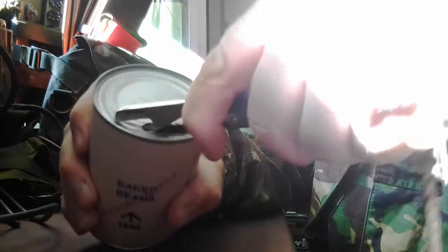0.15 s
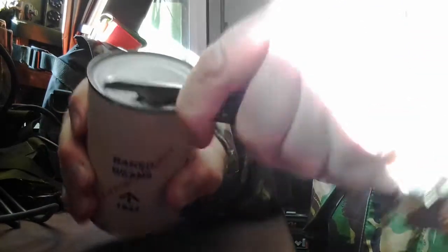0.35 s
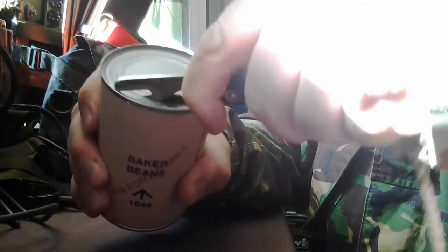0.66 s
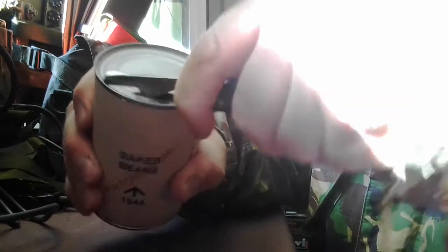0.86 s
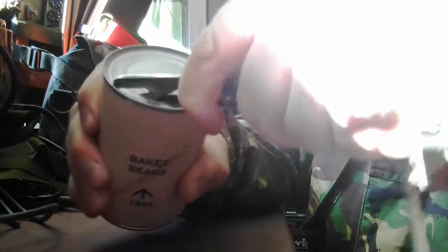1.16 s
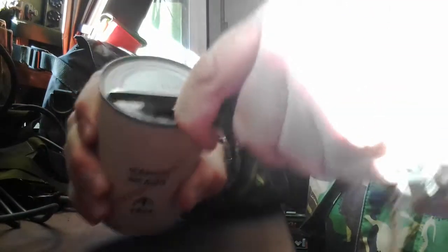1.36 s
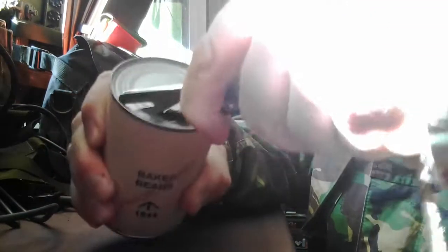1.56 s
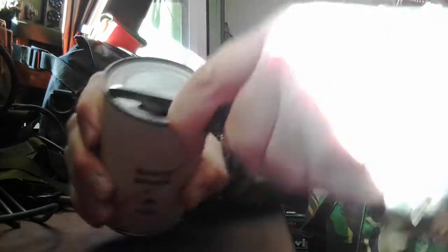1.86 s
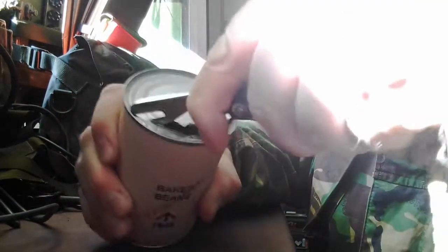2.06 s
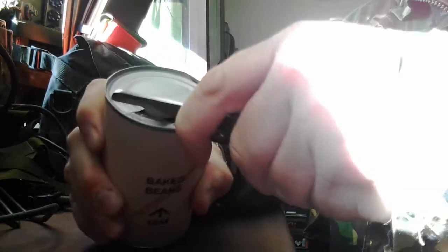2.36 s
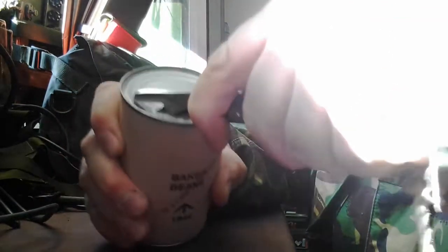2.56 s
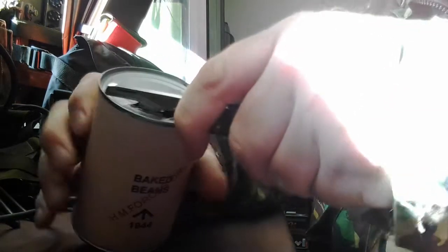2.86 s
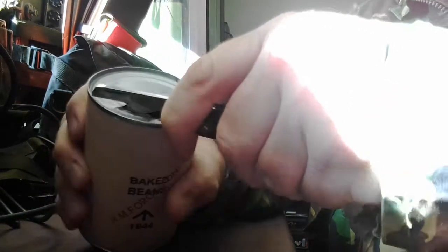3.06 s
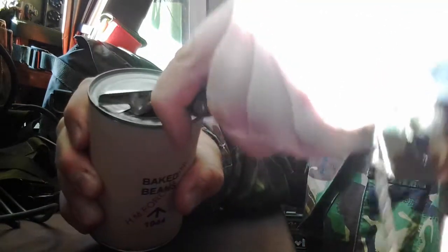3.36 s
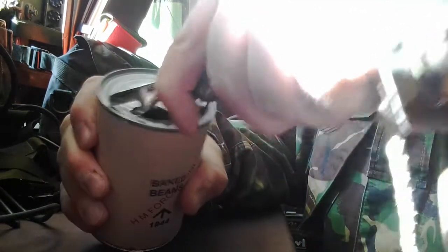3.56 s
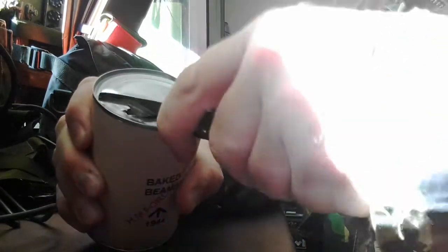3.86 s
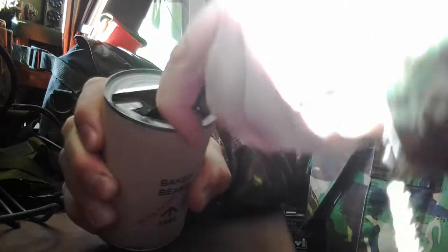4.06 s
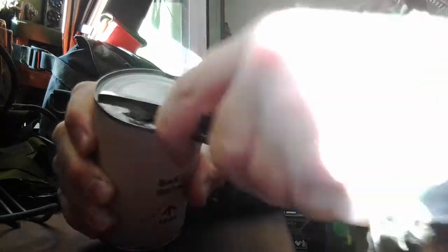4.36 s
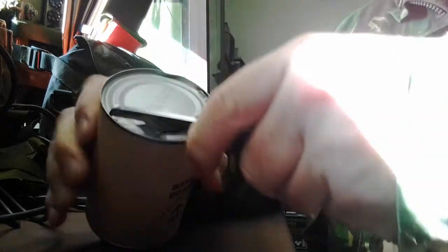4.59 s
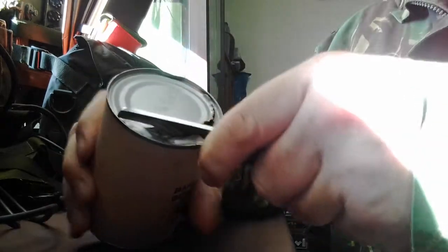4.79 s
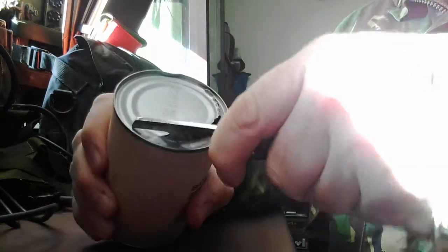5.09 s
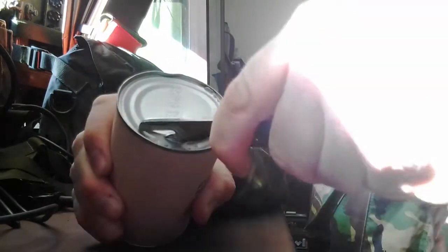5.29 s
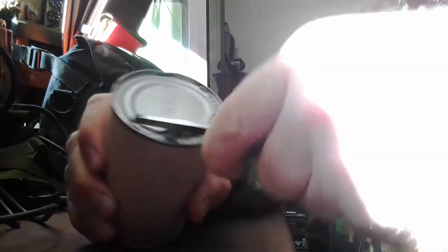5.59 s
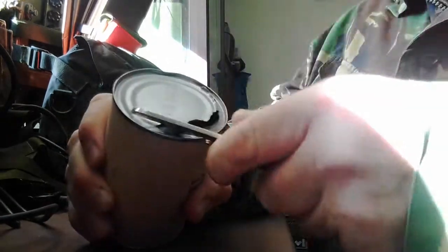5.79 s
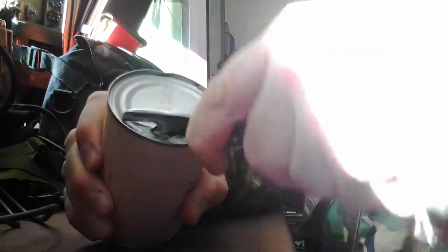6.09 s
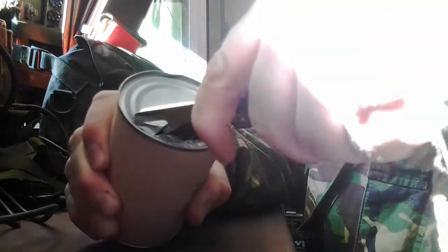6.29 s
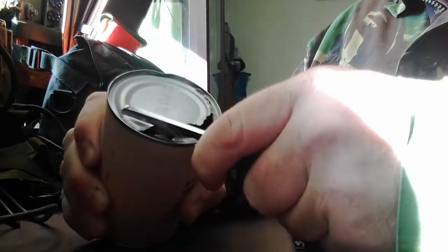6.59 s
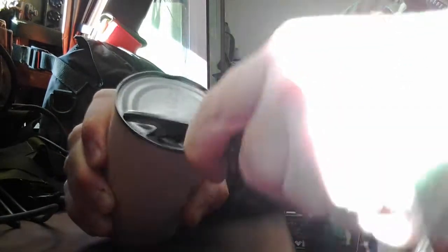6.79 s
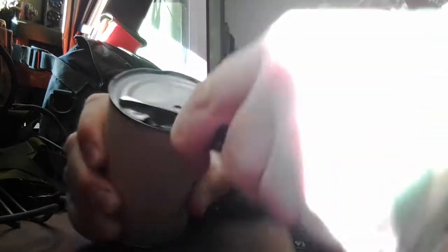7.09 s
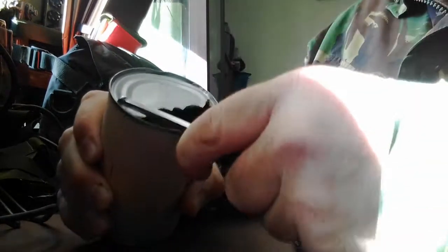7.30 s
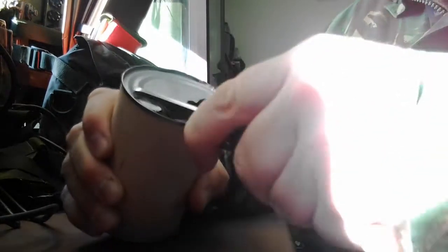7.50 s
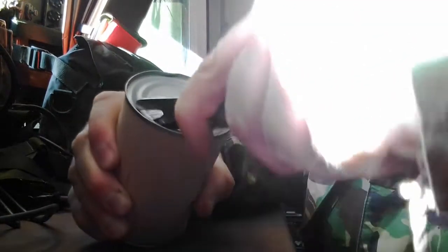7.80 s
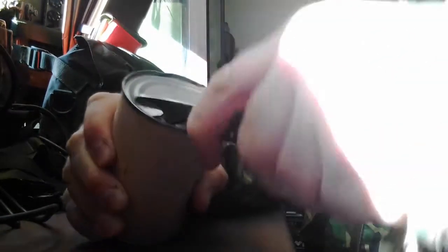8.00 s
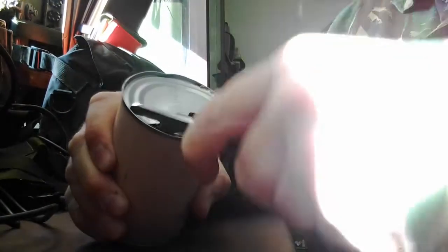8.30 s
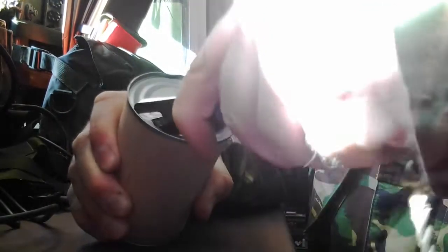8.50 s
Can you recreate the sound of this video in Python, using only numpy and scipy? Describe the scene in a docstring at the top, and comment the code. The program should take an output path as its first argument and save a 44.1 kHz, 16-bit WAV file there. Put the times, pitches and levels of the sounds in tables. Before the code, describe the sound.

Close up, an empty tin's lid honks and rings as a blade tears it in uneven snaps, with rubbing and dull hand thumps.

```python
"""A small lever opener is rocked around the rim of an empty steel tin, close to a webcam in a small room.
Soft noise and a thin whistle last throughout. From the start, a resonant lid honks as the blade tears it in jerks.
A faint early copy of the clink comes before every blow; then noise and dying tones make the steel crack and ring.
Between cuts, random small slips make the opener scrape and clink, and filtered noise rubs.
Now and then the hand thumps softly, as a low dying tone, when it takes a new grip."""
import sys
import numpy as np
from scipy import signal
from scipy.fft import rfft, irfft, next_fast_len
from scipy.io import wavfile
from scipy.ndimage import uniform_filter1d, map_coordinates

SR = 44100
rng = np.random.default_rng(int(sys.argv[2]) if len(sys.argv) > 2 else 0)


def unload_audio(sound):
    """Save the sound as a 16-bit wav file, at the path given as the first command line argument."""
    columns = np.transpose(np.atleast_2d(sound))
    # keep every value between -1 and 1, then stretch to whole-number steps
    steps = np.round(np.clip(columns, -1, 1) * 32767)
    wavfile.write(sys.argv[1], SR, steps.astype(np.int16))


N = 381465
HEAD = round(.01 * SR)  # the first 10 ms of a sound, in samples
TAIL = round(.04 * SR)  # 40 ms, in samples
T = np.arange(round(.3 * SR)) / SR  # the time within one short sound, in seconds

# the lid's swaying shapes: times_note (multiple of its note), level_db (against each other)
LID_SHAPES = [(.7, -6), (0.831, -12), (1, 11), (1.116, 0)]


def amp(db):
    """Turn decibels into a gain."""
    return 10 ** (np.asarray(db) / 20)


def rms(x):
    """Root mean square: the average strength of a sound."""
    return np.sqrt(np.mean(x ** 2) + 1e-20)


def along(points, hz):
    """Read values between (Hz, value) points, with frequency on a log axis."""
    point_hz, value = np.transpose(points)
    return np.interp(np.log(hz + 1), np.log(point_hz + 1), value)


def curves(rows):
    """Draw straight lines through each column after the time: one value per sample."""
    s, *columns = np.transpose(rows)
    return [np.interp(np.arange(N) / SR, s, column) for column in columns]


def filtered(x, response):
    """Shape x by a response that depends on frequency."""
    size = next_fast_len(N + SR // 2)
    spectrum = rfft(x, size) * response(np.fft.rfftfreq(size, 1 / SR))
    return irfft(spectrum, size)[:N]


def band(x, lo_hz, hi_hz, order):
    """Keep the band between two frequencies, without sounding ahead of time."""
    edges_hz = [lo_hz, min(hi_hz, SR / 2 - 1)]
    return signal.sosfilt(signal.butter(order, edges_hz, "band", fs=SR, output="sos"), x)


def add(track, s, sound):
    """Mix a sound into a track at a time in seconds."""
    part = track[max(round(s * SR), 0):][:len(sound)]
    part += sound[:len(part)]


def ring(hz, t60):
    """One dying tone from a random phase; it falls by 60 dB in t60 seconds."""
    return amp(-60 * T / t60) * np.sin(2 * np.pi * (hz * T + rng.random()))


def steady(x, seconds):
    """Even out the slow level of x to about rms 1."""
    power = uniform_filter1d(x ** 2, max(int(seconds * SR), 1))
    power = uniform_filter1d(power, HEAD // 2)
    return x / np.sqrt(np.abs(power) + 1e-4 * np.mean(x ** 2))


def slips(per_second, spread_db):
    """Stick-slip: tiny jerks at uneven times, of uneven sizes and either direction."""
    happens = rng.random(N) < per_second / SR
    return happens * amp(spread_db * rng.standard_normal(N)) * rng.choice([-1, 1], N)


def wobble(rate):
    """A smooth random curve with this many knots a second."""
    knots = rng.standard_normal(int(N * rate / SR) + 4)
    return map_coordinates(knots, [np.arange(N) * rate / SR])


def resonance(f, hz, width_hz):
    """How strongly one resonance answers each frequency f."""
    return 1j * f * width_hz / (hz * hz - f * f + 1j * f * width_hz)


def moving_mode(force, note, t60):
    """A resonance that rings after every jerk while its pitch moves."""
    turn = np.exp(2j * np.pi * np.cumsum(note) / SR)
    keep = amp(-60 / (t60 * SR))  # the share left after each sample
    return (turn * signal.lfilter([1], [1, -keep], force / turn)).real


def fine_body(t60=0.013, direct_db=12):
    """Thin steel has countless close modes: a short, ragged answer of energy 1."""
    answer = rng.standard_normal(len(T)) * amp(-60 * T / t60)
    answer[0] = amp(direct_db)
    return answer / np.linalg.norm(answer)


def blow(head, tail, ring_db):
    """A short burst with a longer ring; together they have rms 1 over the first 10 ms."""
    both = head / rms(head[:HEAD]) + amp(ring_db) * tail / rms(tail[HEAD:TAIL])
    return both / rms(both[:HEAD])


def floor():
    """Soft background noise and a thin electronic whistle, made of narrow noise."""
    # the quiet room and the microphone's own noise: pitch_hz, level_db (shape only)
    noise_shape = [(20, -13.5), (60, 0.5), (140, 2), (300, -1.5), (700, 4), (1500, -9), (3000, -25),
                   (7000, -30), (9000, -45), (15500, -42.5)]
    noise = filtered(rng.standard_normal(N), lambda f: amp(along(noise_shape, f)))
    whistle = band(rng.standard_normal(N), 11970, 12150, order=2)
    return amp(-61.5) * noise / rms(noise) + amp(-96) * whistle / rms(whistle)


def room(x):
    """The small room's answer, 10 ms late; each frequency dies at its own speed."""
    # how long the room rings: pitch_hz, t60_s (time to fall by 60 dB)
    decay = [(150, 0.29), (700, 0.13), (3000, 0.095), (8000, 0.19), (15000, 0.23)]
    hz, t, z = signal.stft(rng.standard_normal(SR // 2), SR, nperseg=256)
    dying = z * amp(-60 * t / along(decay, hz)[:, None])
    tail = signal.istft(dying, SR, nperseg=256)[1]
    return signal.fftconvolve(x, np.pad(tail / np.linalg.norm(tail), (HEAD, 0)))[:N]


def handling(tin):
    """Every jolt also shakes the whole tin in the hand, as a low mutter."""
    # how firmly the hand passes the jolts on: time_s, gain_db
    grip = [(0, -31.5), (1.4, -23), (2, -29), (3.2, -9), (4.1, -14.5), (5, -1.5), (6.5, -19), (8.65, -24.5)]
    jolts = band(tin, 1700, 8000, order=1)
    force = np.sqrt(np.abs(uniform_filter1d(jolts ** 2, HEAD)))
    mutter = band(rng.standard_normal(N), 140, 300, order=2)
    return amp(curves(grip)[0]) * force * mutter / rms(mutter)


def thumps(hz=125, t60=0.064):
    """A new grip gives a dull push: a few low swings and a little rumble."""
    # the hand takes a new grip: start_s, level_db (before the 3 dB lift and soft start below)
    grips = [(0.27, -38.5), (2.096, -27), (2.295, -38.5), (2.484, -28), (2.72, -31.5), (2.914, -26.5),
             (4.456, -32), (6.025, -24), (6.786, -33), (7.248, -36.5), (7.732, -26.5), (8.154, -32),
             (8.457, -44)]
    out = np.zeros(N)
    for s, db in grips:
        rumble = band(rng.standard_normal(len(T)), 110, 190, order=2) * amp(-60 * T / 0.1)
        swings = ring(hz * (1 + 0.047 * rng.standard_normal()), t60)
        push = swings + amp(-18.5) * rumble / rms(rumble[:TAIL])
        soft_start = (1 - np.exp(-T / 0.003)) ** 2
        add(out, s, amp(db + 3.0) * push * soft_start)
    return out


def rubbing():
    """Skin and sleeve slide over the tin, with stray ticks of the loose opener."""
    # the tone of skin and sleeve: pitch_hz, level_db (shape only)
    rub_shape = [(40, -10), (130, 10), (420, 14), (900, -12.5), (1400, 4), (1900, 6), (3000, 2), (4200, 0),
                 (5300, -5.5), (6600, 3), (7500, -9.5), (8500, -12.5), (10500, -29), (15000, -44)]
    fibres = slips(per_second=660, spread_db=1.5) + amp(-19.0) * rng.standard_normal(N)
    pressure = amp(3.5 * wobble(45))
    ticks = slips(per_second=32, spread_db=4.5)
    ticks = signal.fftconvolve(ticks, fine_body(t60=.025, direct_db=10.5))[:N]
    rub = filtered(pressure * fibres + amp(5.5) * ticks, lambda f: amp(along(rub_shape, f)))
    return steady(rub, seconds=0.067)


def drag_levels():
    """Lid, wall and hiss in dB: drags and rubs rise, hold and fall above the hand's light sliding."""
    # how hard the hand slides the tin and the resting opener: time_s, level_db (before the offsets)
    slide = [(0.0, -69.5), (0.48, -71.5), (1.73, -82.5), (1.88, -70), (2.43, -56.5), (2.58, -66.5),
             (3.03, -56.5), (3.49, -66), (4.34, -69.5), (4.55, -57), (5.66, -72.5), (5.88, -74),
             (6.12, -57.5), (6.48, -66), (7.28, -60.5), (8.04, -67), (8.31, -62.5), (8.65, -60)]
    # one drag of the blade, or one rub of the hand over the tin:
    # start_s, length_s, lid_db, wall_db, hiss_db
    drags = [(0.09, 0.06, -56, -62, -82), (0.181, 0.0075, -41, -39, -51.5), (0.244, 0.024, -46, -50, -66),
             (0.353, 0.021, -29, -35.5, -50.5), (0.386, 0.038, -31, -45.5, -48),
             (0.412, 0.036, -28.5, -54.5, -64), (0.596, 0.055, -52, -51.5, -60),
             (0.679, 0.099, -48, -50.5, -67), (0.883, 0.032, -30, -40.5, -53),
             (1.048, 0.13, -45.5, -61.5, -73.5), (1.26, 0.03, -36, -42.5, -65.5),
             (1.424, 0.15, -45, -58.5, -77.5), (1.687, 0.035, -23.5, -37.5, -54),
             (1.897, 0.13, -44.5, -52.5, -58), (2.029, 0.052, -28.5, -39.5, -54),
             (2.192, 0.031, -30, -36.5, -49.5), (2.221, 0.016, -21, -31, -47),
             (2.275, 0.082, -50, -54.5, -54.5), (2.404, 0.023, -32.5, -35, -59),
             (2.497, 0.061, -40.5, -51.5, -50.5), (2.695, .04, -51, -60, -77),
             (2.794, 0.15, -54.5, -64, -58), (2.901, 0.05, -41, -49, -58.5), (3.129, .06, -41.5, -48, -64),
             (3.198, 0.25, -48.5, -60.5, -67), (3.517, 0.034, -53, -65, -77),
             (3.605, 0.036, -32.5, -41.5, -52), (3.787, 0.049, -29.5, -36.5, -50.5),
             (4.017, 0.051, -34.5, -50.5, -58), (4.091, 0.076, -39, -47.5, -63.5),
             (4.307, 0.09, -31.5, -39.5, -53.5), (4.704, 0.1, -77, -79, -61.5),
             (4.858, 0.14, -77, -65, -66.5), (5.012, 0.25, -51.5, -59, -73), (5.639, 0.14, -39.5, -44, -59),
             (5.888, 0.079, -47.5, -47.5, -66), (6.011, 0.064, -45, -50, -58.5),
             (6.13, 0.12, -51.5, -58, -74), (6.458, .11, -54, -52, -61), (6.728, 0.027, -32, -39, -49),
             (6.895, 0.069, -50, -56.5, -56), (7.384, 0.05, -63, -52, -65),
             (7.488, 0.019, -41.5, -42, -48.5), (8.47, 0.053, -55, -53, -52)]
    idle_offsets_db = np.array([[-4], [-4.5], [-2.5]])  # what sliding wakes in lid, wall and hiss
    attack_db_per_s, release_db_per_s = 1703, 520  # each sets in quickly and fades more slowly
    t = np.arange(N) / SR
    power = amp(curves(slide)[0] + idle_offsets_db) ** 2
    for s, length, *levels_db in drags:
        near = slice(*np.searchsorted(t, [s - T[-1], s + length + T[-1]]))
        rise_db = np.minimum(attack_db_per_s * (t[near] - s), 0)
        fall_db = np.maximum(release_db_per_s * (t[near] - s - length), 0)
        power[:, near] += np.outer(amp(levels_db), amp(rise_db - fall_db)) ** 2
    return 10 * np.log10(power)


def scraping(lid_t60=0.071, waver=0.082, clump_db=9.0):
    """The same small slips drive the lid, the wall and a gritty rasp; between cuts the hand rubs."""
    # the lid's note under the dragging blade: time_s, pitch_hz (before its wavering)
    lid_note = [(0, 647), (.4, 613), (.9, 616), (1.5, 616), (1.72, 628), (2.1, 604), (2.25, 655),
                (2.6, 713), (3.6, 716), (4.4, 784), (5.9, 735), (7.5, 693), (8.6, 730)]
    # the wall's resonances that scraping wakes: pitch_hz, width_hz, level_db (against each other)
    wall_modes = [(1003, 22, 8), (1100, 121, 9), (1255, 73, 2), (1644, 69, 1), (1946, 40, -4.5)]
    # the rasp of the blade on the steel: pitch_hz, level_db (shape only)
    rasp_shape = [(1500, -23.5), (2600, -0.5), (2970, 7.5), (3230, -8.5), (3460, -7), (4400, -2),
                  (5200, -8.5), (5550, -8.5), (6100, 4), (7500, -4), (8300, -16.5), (9800, -27),
                  (13000, -39.5), (16000, -45)]
    lid_db, wall_db, hiss_db = drag_levels()
    clumps = amp(clump_db * wobble(70))
    jerks = clumps * (slips(per_second=350, spread_db=6.5) + amp(-22.5) * rng.standard_normal(N))

    # the lid's note wavers with the blade's place and pressure
    note = curves(lid_note)[0] * np.exp(waver * wobble(13))
    lid = sum(amp(db) * moving_mode(jerks, k * note, lid_t60) for k, db in LID_SHAPES)
    lid = steady(band(lid, 409, 860, order=3), seconds=0.03)

    def wall_response(f):
        """Neighbouring resonances of the wall answer with opposite signs."""
        return sum((-1) ** k * amp(db) * resonance(f, hz, width_hz)
                   for k, (hz, width_hz, db) in enumerate(wall_modes))

    wall = steady(band(filtered(jerks, wall_response), 630, 2600, order=2), seconds=0.017)

    grit = jerks + amp(-20.0) * clumps * rng.standard_normal(N)
    grit = signal.fftconvolve(grit, fine_body())[:N]
    rasp = steady(filtered(grit, lambda f: amp(along(rasp_shape, f))), seconds=0.042)
    # the more the lid sounds, the more of the hiss is steel on steel: up to two thirds of its power
    contact = 1 / (1.5 + np.exp(-(lid_db - hiss_db - 16.5) / 4))
    hiss = np.sqrt(contact) * rasp + np.sqrt(1 - contact) * rubbing()
    return amp(lid_db) * lid + amp(wall_db) * wall + amp(hiss_db) * hiss


def steel_tones():
    """Single steel tones of lid and wall swell softly and die away."""
    # the single tones: start_s, pitch_hz, level_db (before the soft start), t60_s
    tones = [(1.778, 787, -10.5, 0.059), (1.778, 1340, -28, 0.18), (1.778, 1950, -26, 0.093),
             (1.905, 1186, -15, 0.079), (2.033, 1000, -11, 0.082), (2.198, 1128, -16, 0.1),
             (2.221, 640, -30, 0.039), (2.275, 815, -25, 0.16), (2.405, 442, -2, 0.058),
             (2.407, 783, -19, 0.2), (2.943, 1066, -32.5, 0.2), (4.012, 749, -15, 0.13),
             (6.728, 703, -26, 0.14), (7.146, 649, -4, 0.07), (7.376, 638, -32, 0.14),
             (7.457, 639, -29, 0.15), (8.09, 1540, -36, 0.11), (8.277, 615, -16, 0.097)]
    out = np.zeros(N)
    for s, hz, db, t60 in tones:
        add(out, s, amp(db) * ring(hz, t60) * (1 - np.exp(-T / 0.018)))
    return out


def lid_honk(hz, swell, ring_db, low_hz, build=0.004):
    """The lid swells within a few cycles and is choked by the blade; its other shapes linger."""
    tones = ring(hz, 0.98) + amp(-10.5) * ring(0.756 * hz, 0.84)
    head = T * np.exp(-T / max(swell, .0005)) * tones
    tail = 0
    for k, db in LID_SHAPES:
        level = amp(db + 2 * rng.standard_normal())
        tail = tail + level * ring(hz * k * (1 + 0.019 * rng.standard_normal()), t60=0.061)
    return blow(band(head, low_hz, 2900, order=3), tail * (1 - np.exp(-T / build)) ** 2, ring_db)


def steel_clink(ring_db, crack_t60=0.035, shimmer_db=9, shimmer_t60=.13, rattle_db=6.5):
    """A crack, then the strong modes over a shimmer of many weak ones."""
    # the tin's wall and the opener, before random scatter: pitch_hz, level_db (relative), t60_s
    steel_modes = [(1098, 17, 0.03), (1230, 6.5, 0.017), (1543, -8.5, 0.048), (1618, 1.5, 0.06),
                   (1763, -6, 0.048), (2110, -7, 0.1), (2426, 2.5, 0.074), (2979, 9, 0.11),
                   (2920, 6.5, 0.089), (3200, -21.5, 0.053), (3420, -3.5, 0.13), (3580, -14, 0.041),
                   (4150, -10, 0.23), (4110, -11, 0.1), (5270, -22.5, 0.12), (4880, -12, 0.11),
                   (5180, -12.5, 0.067), (6200, -11.5, 0.1), (5930, -14.5, .14), (6530, 5, 0.027),
                   (6400, -19.5, 0.075), (6750, -3, 0.053), (7200, -8, 0.038), (9000, -2, .11)]
    mode_scatter_db = 7  # each blow lands elsewhere and favours other modes
    crack = rng.standard_normal(len(T)) * amp(-60 * T / crack_t60)
    modes = 0
    for hz, db, t60 in steel_modes:
        level = amp(db + mode_scatter_db * rng.uniform(-1.1, 1))
        modes = modes + level * ring(hz * (1 + 0.0097 * rng.standard_normal()), t60)
    # a random few of all frequencies, each at a random phase
    hz = np.fft.rfftfreq(len(T), 1 / SR)
    chosen = rng.random(len(hz)) < .035
    weak = irfft(chosen * np.exp(2j * np.pi * rng.random(len(hz))), len(T))
    shimmer = amp(shimmer_db - 60 * T / shimmer_t60) * weak / rms(weak)
    # the hinged blade chatters while the steel rings
    knots = np.linspace(0, T[-1], num=60)
    chatter = amp(rattle_db * np.interp(T, knots, rng.standard_normal(len(knots))))
    return blow(crack, (modes + shimmer) * chatter, ring_db)


def strikes():
    """Where the blade lands decides how much the lid, the wall, the opener and its edge each sound."""
    # the blade snaps through or hits the rim; the steel rings on if it springs clear:
    # start_s, lid_hz, lid_db, wall_db, opener_db, edge_db, ring_db (ring against the first burst)
    hits = [(0.017, 605, -35, -46, -68, -72, -14.5), (0.193, 640, -27, -38.5, -54, -55.5, -19),
            (0.344, 585, -30.5, -41, -65, -61.5, -11), (0.426, 653, -20, -33.5, -51, -47, -16),
            (0.567, 729, -18, -43, -48, -59, 4), (0.58, 731, -14, -21.5, -39, -42.5, -6.5),
            (0.646, 656, -33, -42, -58, -53.5, -11), (0.722, 640, -23.5, -37.5, -58, -59, -17),
            (0.904, 628, -24.5, -45, -64, -58, -11), (0.926, 634, -26.5, -34.5, -51.5, -54, -26),
            (1.026, 686, -36, -51, -66.5, -65, -22), (1.714, 734, -19.5, -32, -55.5, -50, -9),
            (1.777, 731, -24, -31, -45, -45, -23), (1.902, 686, -20, -28.5, -51, -51, -18.5),
            (2.031, 705, -21, -29, -53.5, -45, -13.5), (2.22, 679, -18, -27.5, -50, -50.5, -8),
            (2.273, 752, -28, -39.5, -63, -47.5, -10), (2.403, 748, -12.5, -32.5, -50, -43.5, -23),
            (2.491, 680, -26.5, -31.5, -52, -47.5, -12.5), (2.757, 697, -37, -54, -66, -58, -21),
            (2.829, 726, -33.5, -42.5, -66, -55.5, -2), (3.069, 680, -36.5, -47.5, -73, -68, -9),
            (3.135, 706, -33.5, -43.5, -67.5, -61, -4), (3.251, 685, -30, -44.5, -76, -72, -17),
            (3.394, 713, -31, -46, -78, -64.5, -18), (3.493, 575, -44.5, -51.5, -64, -59.5, -22),
            (3.607, 830, -47.5, -41.5, -56, -51, -5), (3.819, 710, -26.5, -31.5, -65, -48, 12),
            (3.987, 626, -37, -33.5, -47, -57, -15), (4.007, 635, -13.5, -21, -42, -45.5, -12.5),
            (4.351, 748, -24.5, -27.5, -44, -43.5, -9.5), (4.457, 733, -38.5, -45.5, -55.5, -46, -16),
            (4.609, 720, -63, -55, -58, -55, 0), (4.806, 746, -61, -58, -58, -55.5, -11),
            (5.118, 721, -33.5, -37.5, -54.5, -57, -15.5), (5.278, 760, -37, -47.5, -61.5, -68, -17),
            (5.704, 736, -29, -33, -47.5, -54, -5), (5.881, 720, -42, -41.5, -64, -62, -5),
            (5.902, 754, -26.5, -47.5, -63, -68, -13.5), (5.963, 490, -31.5, -29, -55, -53.5, -17),
            (6.003, 742, -30.5, -29.5, -46.5, -45.5, -8), (6.126, 730, -25, -27.5, -38.5, -38, -19),
            (6.281, 752, -41.5, -40.5, -54, -49.5, -14), (6.526, 870, -43, -42, -47, -51.5, -11),
            (6.545, 747, -23, -27.5, -52, -43.5, -17), (6.585, 864, -25.5, -33.5, -54.5, -57, -15.5),
            (6.726, 715, -15.5, -20, -35.5, -35.5, -11.5), (7.143, 655, -21, -20.5, -30, -27.5, -9.5),
            (7.231, 690, -46, -44, -60, -54, -13.5), (7.374, 650, -40.5, -39.5, -61, -54, -12),
            (7.455, 611, -41, -36, -51, -56, -3), (7.502, 612, -36.5, -37.5, -41.5, -47, -22),
            (7.681, 615, -50, -43, -54.5, -58.5, -7), (8.047, 710, -37, -34.5, -54, -48.5, -9.5),
            (8.054, 640, -39, -37, -55, -51, -36), (8.089, 612, -30, -22, -26, -33.5, -3),
            (8.276, 660, -35, -30, -52, -56, -3), (8.336, 724, -39, -40, -58, -56.5, -17),
            (8.367, 730, -36, -28.5, -33, -23.5, -15.5), (8.545, 648, -39.5, -35, -46.5, -38.5, -15.5),
            (8.622, 760, -45.5, -43, -63, -55.5, -5)]
    lid_ring_db = 3  # the lid's ring, over that of the other steel
    swell_s, swell_per_db = 0.00095, 0.082  # the swell grows as the lid takes more than the wall
    lid_low_hz, lid_sag_hz_per_s = 436, 31.4  # the further the lid is cut, the lower it can sway
    wall_base_hz, wall_rise_hz_per_db = 830, 50  # blows on the stiff rim wake higher wall modes
    top_base_db, top_per_db = -24.5, 0.44  # the click's very top grows as the edge takes more
    # a faint early copy of the clink comes a few milliseconds before every blow
    early_s, early_db = .006, -29.5  # half to 1.5 times this early
    out = np.zeros(N)
    for s, hz, lid_db, wall_db, opener_db, edge_db, ring_db in hits:
        swell = swell_s * np.exp(swell_per_db * (lid_db - wall_db))
        low_hz = max(lid_low_hz - lid_sag_hz_per_s * s, 100)
        honk = lid_honk(hz, swell, ring_db + lid_ring_db, low_hz)
        clink = steel_clink(ring_db)
        # a blade buried in the lid damps the upper modes of both wall and opener
        wall_low_hz = min(wall_base_hz + wall_rise_hz_per_db * max(wall_db - lid_db, 0), 1300)
        wall_high_hz = np.clip(2051.5 - 30 * (lid_db - wall_db), 1500, 2500)
        wall = band(clink, wall_low_hz, wall_high_hz, order=4)
        buried = np.clip((lid_db - opener_db) / 30, 0, 1)
        opener = band(clink, 3020 - 150 * buried, 5000 - 1300 * buried, order=3)
        # a harder contact of the edge is shorter, so it reaches higher
        top_db = min(top_base_db + top_per_db * (edge_db - wall_db), -14)
        edge = band(clink, 5050, 7560, order=4) + amp(top_db) * band(clink, 7000, 11500, order=2)
        parts = [(wall_db, wall), (opener_db, opener), (edge_db, edge)]
        metal = sum(amp(db) * part / rms(part[:HEAD]) for db, part in parts)
        add(out, s, amp(lid_db) * honk + metal)
        add(out, s - early_s * (.5 + rng.random()), amp(early_db) * metal)
    return out


def scene():
    """The tin close by, in its room."""
    tin = strikes() + steel_tones() + scraping()
    near = tin + thumps() + handling(tin)
    return (near + amp(-16.5) * room(near) + floor())[None]


def record(dry):
    """The webcam keeps nothing from its band limit of 15900 Hz upwards."""
    return filtered(dry[0], lambda f: f < 15900)[None]


dry = scene()
out = record(dry)
unload_audio(out)
```